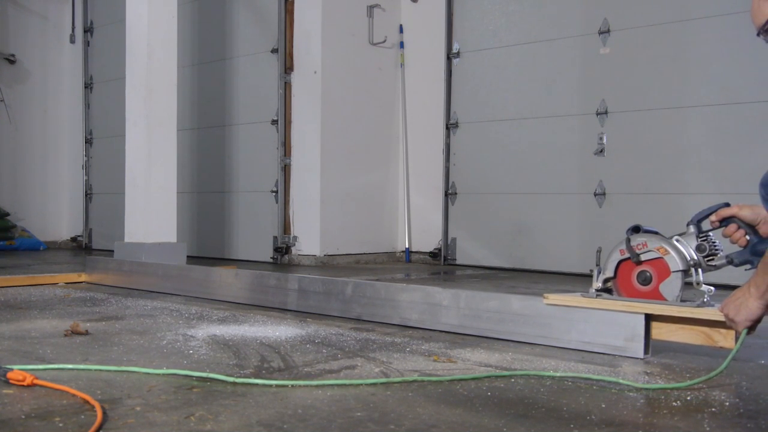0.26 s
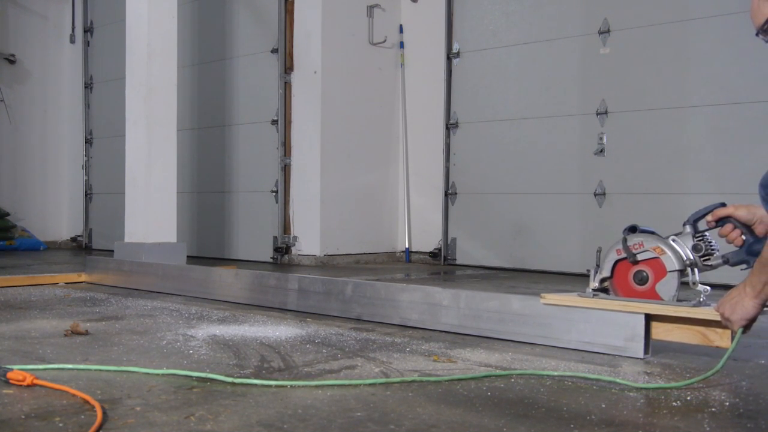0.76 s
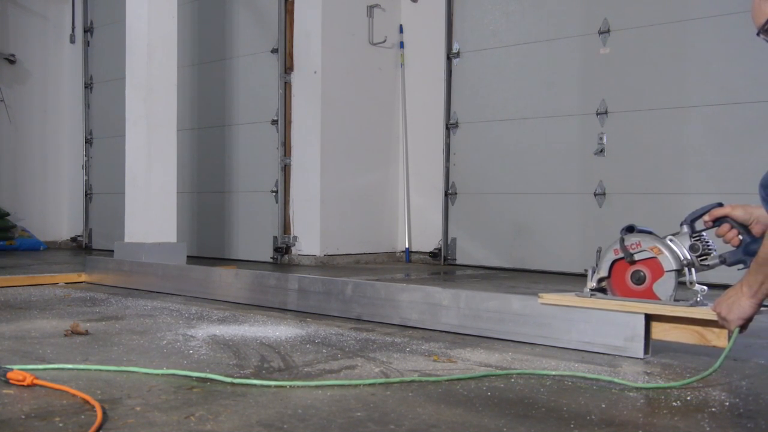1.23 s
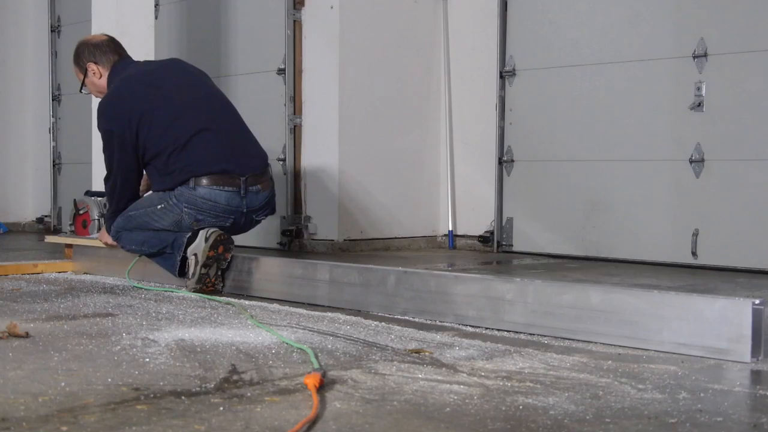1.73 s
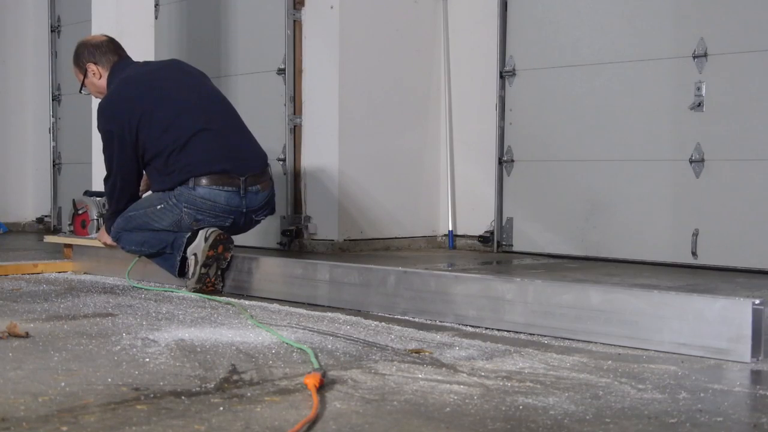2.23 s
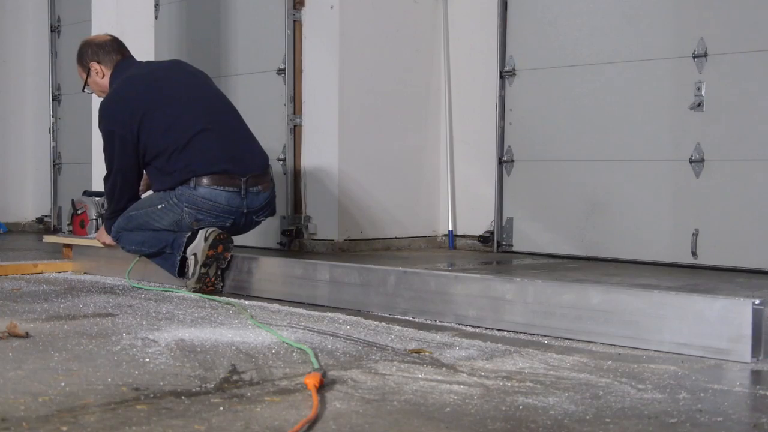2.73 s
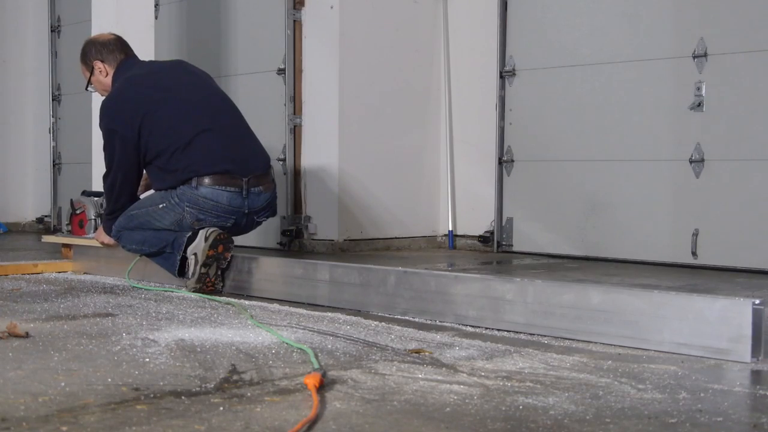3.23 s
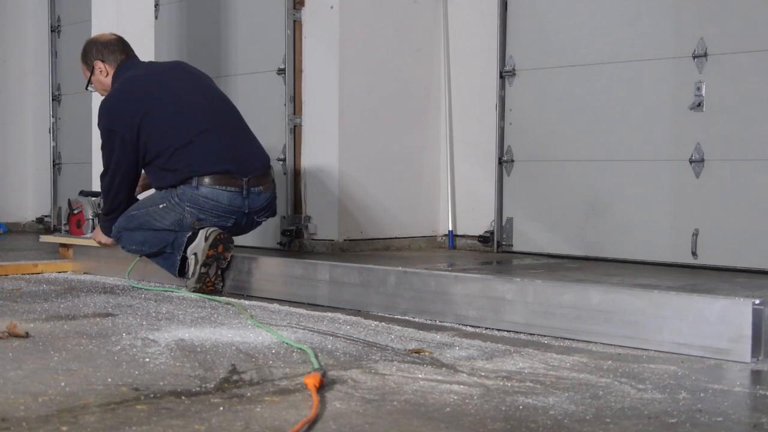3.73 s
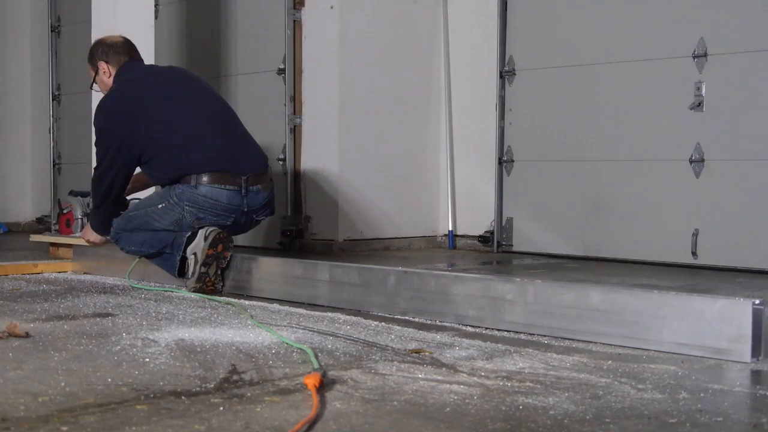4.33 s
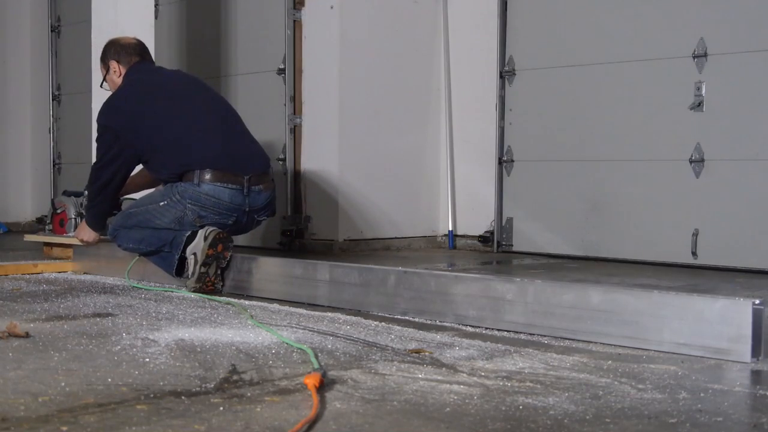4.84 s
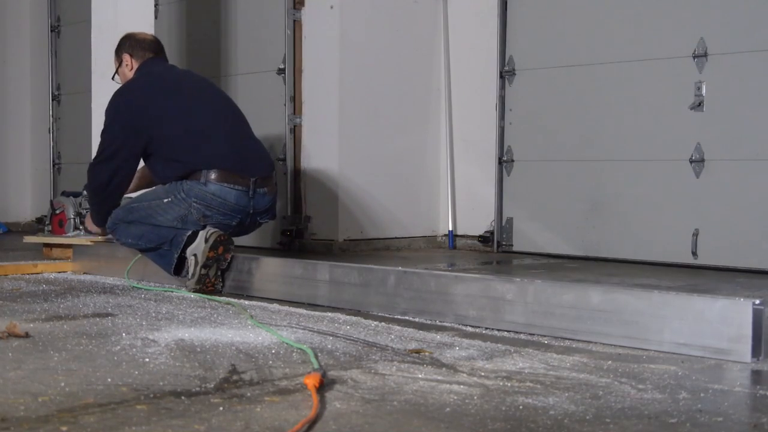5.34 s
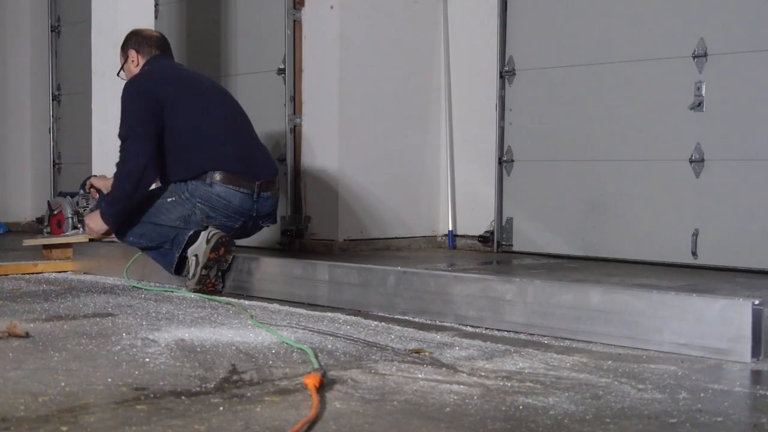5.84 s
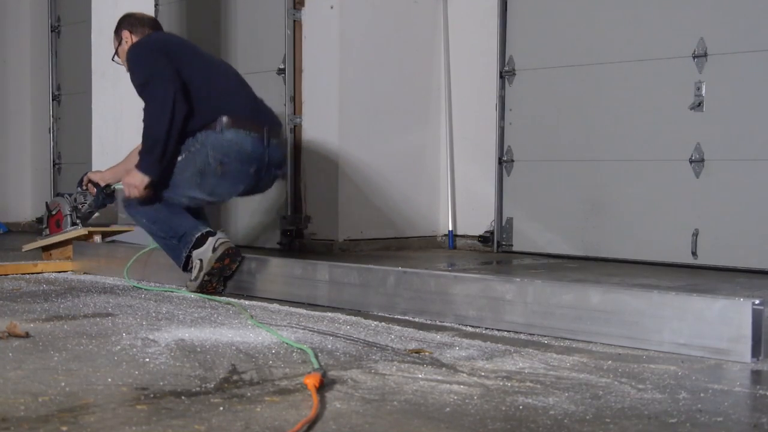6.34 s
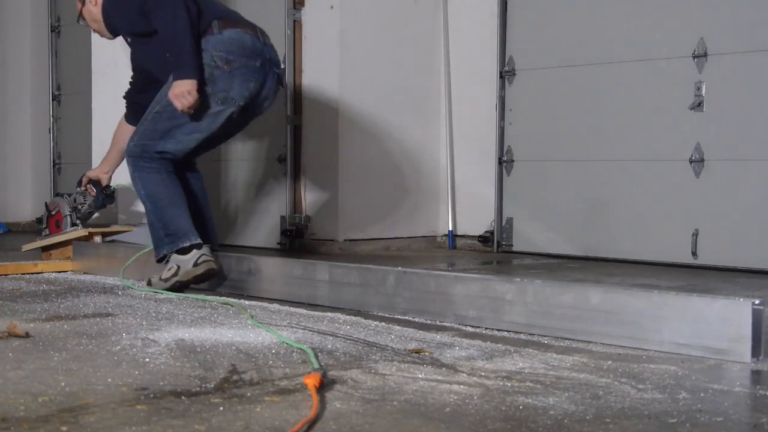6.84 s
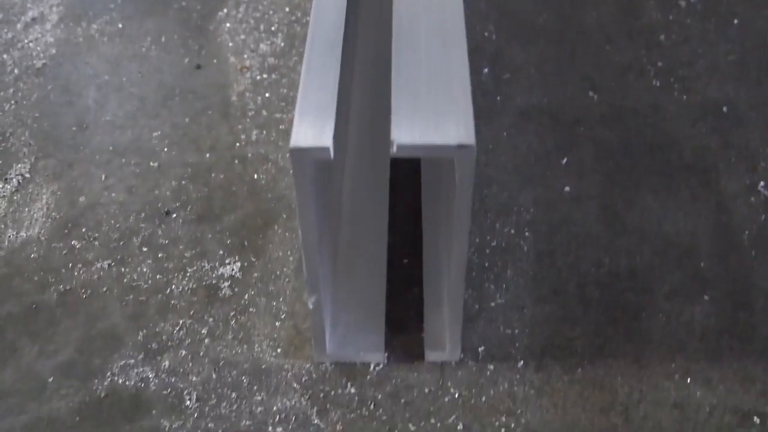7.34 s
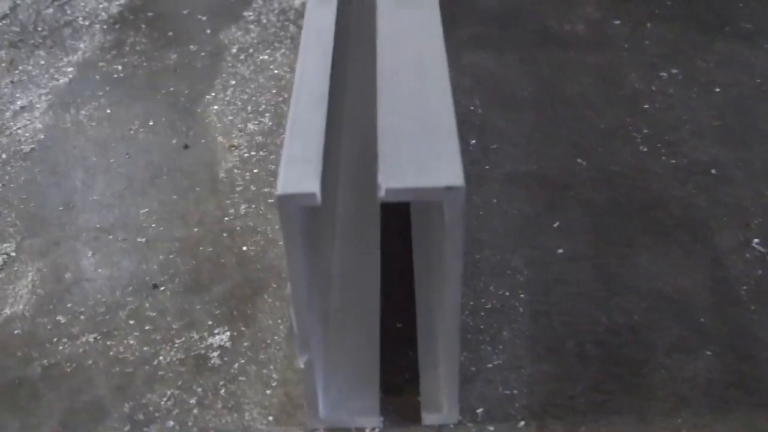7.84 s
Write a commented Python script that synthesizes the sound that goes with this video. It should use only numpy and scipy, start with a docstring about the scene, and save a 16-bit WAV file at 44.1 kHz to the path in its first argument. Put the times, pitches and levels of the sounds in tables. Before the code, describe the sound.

A handheld circular saw is already running close to the microphone, a steady motor roar with a held whine and hissing metal chips. At 1.5 seconds the sound jumps to across a concrete garage, with a short echo. The teeth grind and sing through an aluminium tube in a rough, fluttering, ringing tone that sags in pitch until about 2 seconds, then climbs steadily as the blade speeds up. The tube rattles lightly around 3.2 seconds and harder, twice, near 4.2 and 4.3. A bright screech at about 4.6 ends the cut. The motor is released and the blade coasts with an airy whirr that falls in pitch but stays fairly loud. At 7 seconds it cuts abruptly to the quiet garage: a soft rush from outside, a fading hiss, and two tiny ticks of chips underfoot near 7.5 and 8 seconds.

```python
"""Circular saw in a concrete garage

A hand-held saw, heard from three places in turn. Close by, its fan roars and its housing whines.
From across the floor its teeth sing through the end of an aluminium tube, bog down, speed up,
rattle out of the cut and coast. Last comes the quiet garage with a rush from outside."""
import sys
import numpy as np
from scipy import signal
from scipy.fft import rfft, irfft, next_fast_len
from scipy.io import wavfile
from scipy.ndimage import uniform_filter1d

SR = 44100
rng = np.random.default_rng(int(sys.argv[2]) if len(sys.argv) > 2 else 0)


def transcribe(u):
    """Save the signal u as a 16-bit wav file named by the first command-line argument.

    u: samples, shape (n,) or (channels, n), limited to [-1, 1]; the rate is SR.
    q: integer samples, one column per channel.
    """
    v = np.clip(np.atleast_2d(u).T, -1, 1)
    q = np.round(v * 32767).astype(np.int16)
    wavfile.write(sys.argv[1], SR, q)


N = 356328
TIME = np.arange(N) / SR
CLOSE, ACROSS, LAST = range(3)   # listening places
MOVES_S = (1.492, 6.99)


def from_db(db):
    """Decibels to gain."""
    return np.exp(np.asarray(db) * np.log(10) / 20)


def rms_one(x):
    """Scale to rms 1."""
    return x / np.sqrt(np.mean(x ** 2) + 1e-20)


def in_time(rows):
    """Table columns as curves over all samples."""
    times_s, *columns = np.transpose(rows)
    return [np.interp(TIME, times_s, column) for column in columns]


def at_hz(points, hz):
    """Interpolate on a log frequency axis."""
    points_hz, values = np.transpose(points)
    return np.interp(np.log(hz), np.log(points_hz), values)


def swell(centre_s, length_s, db):
    """Flat-topped bump of gain."""
    return from_db(db) * np.exp(-(2 * (TIME - centre_s) / length_s) ** 4)


def drift(rate_hz):
    """Slow random curve, rms 1."""
    hop, settle = 40, 2000
    r = np.exp(-2 * np.pi * rate_hz * hop / SR)
    slow = signal.lfilter([1], [1, -2 * r, r * r], rng.standard_normal(N // hop + settle + 2))[settle:]
    return np.interp(np.arange(N) / hop, np.arange(len(slow)), rms_one(slow))


def wavering(cycles, wobble_rad):
    """Sine with wandering phase, rms 1."""
    return np.sqrt(2) * np.sin(2 * np.pi * cycles + wobble_rad * drift(10.6))


def blurred(cycles, width_hz):
    """Noise band riding on a pitch, rms 1."""
    r = np.exp(-np.pi * width_hz / SR)
    a, b = signal.lfilter([1], [1, -2 * r, r * r], rng.standard_normal((2, N)))
    return rms_one(a * np.sin(2 * np.pi * cycles) + b * np.cos(2 * np.pi * cycles))


def butter(x, hz, kind):
    """Fourth-order low- or high-pass."""
    return signal.sosfilt(signal.butter(4, hz, kind, fs=SR, output="sos"), x)


def resonance(x, hz, width_hz):
    """Two-pole ring, peak gain 1."""
    r = np.exp(-np.pi * width_hz / SR)
    gain = (1 - r * r) / 2
    return signal.lfilter([gain, 0, -gain], [1, -2 * r * np.cos(2 * np.pi * hz / SR), r * r], x)


def ringing(x, modes):
    """Parallel resonances driven by x."""
    return sum(from_db(db) * resonance(x, hz, width_hz) for hz, width_hz, db in modes)


# Likeness of the two ears: f/Hz, correlation
EAR_LIKENESS = [(30, .1), (130, 0.99), (640, 0.71), (1400, 0.81), (3100, 0.82), (6800, 0.52), (15000, 0.44)]


def roar(spectrum, modes, patchy_db, place, echo_t60_s=.3, echo_db=-10):
    """Stereo turbulence at one place, rms 1: lifted at resonances, combed by floor and wall echoes."""
    edges = [0, *(np.array(MOVES_S) * SR).astype(int), N]
    start, end = edges[place], min(edges[place + 1] + SR // 20, N)
    size = next_fast_len(end - start)
    hz = np.maximum(np.arange(size // 2 + 1) * SR / size, 10)
    lift_db = sum(db / (1 + (2 * (hz - mode_hz) / width_hz) ** 2) for mode_hz, width_hz, db in modes)
    inside = (hz > spectrum[0][0]) & (hz < spectrum[-1][0])
    shape = inside * from_db(at_hz(spectrum, hz) + lift_db)
    age_s = np.arange(SR // 4) / SR
    echoes = rms_one(rng.standard_normal((2, len(age_s))) * from_db(-60 * age_s / echo_t60_s))
    comb = 1 + from_db(echo_db) * rfft(echoes, size) / np.sqrt(len(age_s))
    mid, side = rfft(rng.standard_normal((2, size))) * comb
    alike = at_hz(EAR_LIKENESS, hz)
    ears = shape * (np.sqrt(1 + alike) * mid + np.sqrt(1 - alike) * side * [[1], [-1]])
    band = np.log2(hz / spectrum[0][0]) / 1.5   # 1.5-octave bands swell independently
    out = 0
    for k in range(int(band[inside].max()) + 2):
        share = np.clip(1 - abs(band - k), 0, 1)
        gain = from_db(patchy_db * drift(8.2)[start:end])
        out = out + gain * irfft(ears * share, size)[:, :end - start]
    return np.pad(rms_one(out), ((0, 0), (start, N - end)))


def garage(x, t60_s=1, wet_db=-7):
    """Direct sound plus a separate diffuse tail in each ear."""
    age_s = np.arange(int(1.2 * SR)) / SR
    tail = rng.standard_normal((2, len(age_s))) * from_db(-60 * age_s / t60_s) * (age_s > .006)
    tail /= np.sqrt(np.sum(tail ** 2, axis=1, keepdims=True))
    wet = signal.fftconvolve(x[None], tail, axes=1)[:, :N]
    return (x + from_db(wet_db) * wet) / np.sqrt(1 + from_db(2 * wet_db))


# Saw close by: t/s, motor and fan/dB, chip spray/dB
NEAR_LEVELS = [(0, -26.5, -30), (0.2, -26.5, -28), (0.75, -27.5, -29), (1.27, -28, -29),
               (1.47, -26.5, -29.5)]
# Motor and fan spectrum: f/Hz, level/dB
NEAR_FAN = [(59, -82), (100, -47), (204, -22), (635, -8), (719, -3.5), (800, -1), (923, -4), (1010, -2),
            (1250, -2), (1440, -7), (2240, -8.5), (2780, -4), (7000, -8.5), (9100, -21), (15400, -120)]
# Chip spray spectrum: f/Hz, level/dB
NEAR_CHIPS = [(3240, -8), (5500, -2.5), (6080, -10), (7860, -9), (9570, -4.5), (11000, -5), (12900, -9.5),
              (15600, -12)]
# Motor orders, housing and guard: f/Hz, width/Hz, lift/dB
NEAR_PEAKS = [(210, 10, 7), (317, 10, 7.5), (414, 10, 8), (527, 8.9, 7), (605, 14, 2.5), (700, 25, 4.5),
              (737, 12.5, 7.5), (857, 16, 5), (1056, 12, 8), (1220, 63, 6), (1275, 50, 4), (1310, 43, 4),
              (1980, 520, 7.5), (2590, 25, 10), (2830, 390, 6.5), (3660, 24, 12), (5070, 110, 2.5),
              (5500, 120, 2.5), (9860, 460, 1)]
# Housing whines: f/Hz, relative level/dB
WHINES = [(947.5, 4.5), (3160, -0.5), (2850, -23)]
# Whine swells: centre/s, length/s, level/dB
WHINE_LEVELS = [(0.24, 0.19, -38.5), (0.577, 0.43, -39.5), (0.962, 0.074, -44)]


def saw_near():
    """Fan and brushes roar, chips spray, the housing whines at held pitches."""
    fan_db, chips_db = in_time(NEAR_LEVELS)
    whines = sum(from_db(db + 1.9 * drift(4)) * wavering(hz * TIME, wobble_rad=.9) for hz, db in WHINES)
    whines *= sum(swell(*row) for row in WHINE_LEVELS)
    fan = from_db(fan_db) * roar(NEAR_FAN, NEAR_PEAKS, patchy_db=.7, place=CLOSE)
    chips = from_db(chips_db) * roar(NEAR_CHIPS, NEAR_PEAKS, patchy_db=1.5, place=CLOSE)
    return fan + chips + garage(whines)


def rumble(level_db=-65.5, top_hz=35):
    """Faint deep noise under the saw."""
    return from_db(level_db) * rms_one(butter(rng.standard_normal((2, N)), top_hz, "low"))


# Blade under power: t/s, tooth rate/Hz
BLADE_SPEED = [(1.49, 2075), (1.6, 2025), (1.78, 1950), (1.9, 1840), (1.97, 1783), (2.05, 1760),
               (2.13, 1797), (2.22, 1905), (2.36, 2150), (2.52, 2415), (2.62, 2530), (2.67, 2560),
               (2.8, 2665), (2.97, 2748), (3.14, 2798), (3.4, 2830), (3.8, 2910), (4.0, 2938), (4.17, 2960),
               (4.45, 3025), (4.62, 3045)]
RELEASE_S = BLADE_SPEED[-1][0]


def blade_rate(drag_s=4.15, friction_hz=2200):
    """Teeth per second: driven until trigger release, then slowed by air drag and bearing friction."""
    coasting = np.exp(-np.maximum(TIME - RELEASE_S, 0) / drag_s)
    rate_hz = (in_time(BLADE_SPEED)[0] + friction_hz) * coasting - friction_hz
    return uniform_filter1d(rate_hz, size=SR // 20)   # blade inertia


# Blade in the cut: t/s, tooth tone/dB, overtones/dB
TOOTH_LEVELS = [(1.49, -38, -29), (1.56, -43, -48), (1.65, -37.5, -38), (1.72, -50, -40), (1.9, -33.5, -27),
                (1.99, -34, -35), (2.06, -32, -32), (2.1, -50, -40), (2.13, -35, -35), (2.22, -40, -31),
                (2.29, -58, -34), (2.36, -44, -34), (2.4, -48, -32), (2.44, -40, -36), (2.48, -54, -33),
                (2.53, -40, -42), (2.59, -41, -31), (2.62, -35, -27), (2.645, -34.5, -37), (2.67, -50, -33),
                (2.74, -38, -35), (2.8, -37.5, -39), (2.88, -43, -37), (3.0, -46, -43), (3.14, -34, -36),
                (3.2, -43, -34), (3.23, -60, -39), (3.255, -55, -43), (3.275, -35, -37), (3.3, -42, -33),
                (3.325, -55, -37), (3.35, -40, -40), (3.39, -48, -37), (3.46, -70, -46), (3.7, -58, -59),
                (3.78, -41, -52), (3.9, -65, -42), (3.94, -38.5, -41), (4.01, -44, -49), (4.08, -72, -39),
                (4.16, -40.5, -30), (4.22, -59, -51), (4.33, -36.5, -40), (4.39, -39, -40),
                (4.45, -36, -38), (4.5, -46, -38), (4.62, -54, -41)]
# Partials 2 to 5: relative level/dB
PARTIALS_DB = [1, -2, -6, -16]
# Teeth in the metal: t/s, wall grinding/dB, chip noise/dB, screech/dB
BITE_LEVELS = [(1.5, -42, -36.5, -42), (1.7, -32, -35.5, -41), (2.07, -44, -41.5, -39.5),
               (2.25, -35, -41, -37), (2.36, -26, -45, -46), (2.6, -34.5, -42, -36), (2.8, -40, -45, -44),
               (3.3, -39, -51, -44), (3.5, -40.5, -46, -47), (4.05, -47, -47.5, -65),
               (4.3, -39, -46.5, -51), (4.6, -37, -35, -22)]
# Tube resonances: f/Hz
TUBE_HZ = [1768, 1840, 1930, 2010, 2155, 2290, 2408, 2537, 2662, 2798, 2938, 3030]
# Peak of each: gain/dB
TUBE_DB = [14, 12, 11, 13, 13, 13, 11, 18, 9, 16, 14, 5]
TUBE_WIDTH_HZ = 26
TUBE_MODES = [(hz, TUBE_WIDTH_HZ, db) for hz, db in zip(TUBE_HZ, TUBE_DB)]
# Upper rings of the tube wall: f/Hz, width/Hz, gain/dB
WALL_MODES = [(3560, 30, 9), (3690, 30, 12), (3850, 35, 10), (4050, 30, 12), (4210, 35, 11), (4400, 40, 8),
              (5050, 40, 8), (5250, 45, 10)]


def tooth_song(teeth, rate_hz, clean_hz=3030, thin_s=3.45):
    """Tooth strikes make partials that roughen under load and ring the tube at its resonances."""
    tone_db, overtones_db = in_time(TOOTH_LEVELS)
    _, chips_db, screech_db = in_time(BITE_LEVELS)
    slowing = np.maximum(clean_hz - rate_hz, 0) / 500
    load = np.minimum(slowing, 1)
    flare_db = 1.2 * drift(20) + 3 * load * drift(35)   # blade wobbles in the kerf
    smear_rad = 1.25 * load
    first = from_db(tone_db + flare_db) * wavering(teeth, wobble_rad=.1 + smear_rad)
    first += from_db(chips_db) * blurred(teeth, width_hz=297)   # uneven chips
    chatter = from_db(tone_db - 8) * blurred(teeth, width_hz=450)   # uneven teeth
    chip_shake = from_db(chips_db + 3) * rng.standard_normal(N)
    tube = ringing(first + chatter + chip_shake, TUBE_MODES)
    upper_loss_db = 4 * slowing + 11 * np.clip((TIME - thin_s) / .1, 0, 1)
    overtones = 0
    for k, db in enumerate(PARTIALS_DB, start=2):
        loss_db = upper_loss_db if k > 2 else 7 * load
        gain = from_db(overtones_db + db - loss_db + 1.8 * drift(9.3))
        cycles = k * (teeth + smear_rad * drift(30) / (4 * np.pi))
        overtones += gain * blurred(cycles, width_hz=26 * k)
    screech = from_db(screech_db + flare_db) * blurred(2 * teeth, width_hz=420)
    return first + tube + overtones + screech + ringing(screech, WALL_MODES)


# Saw across the floor: t/s, low roar/dB, motor and fan/dB, chips and blade air/dB
FAR_LEVELS = [(1.5, -32.5, -25, -32.5), (1.8, -33, -25, -32), (2.24, -34.5, -26, -36.5),
              (2.55, -40, -28.5, -35), (2.62, -40.5, -31, -31.5), (2.85, -42, -33, -36.5),
              (3.29, -41.5, -30.5, -31.5), (3.49, -39, -31.5, -37.5), (3.8, -40, -32, -36),
              (4.08, -37, -30, -34), (4.3, -35.5, -29.5, -32), (4.45, -37, -29.5, -38),
              (4.75, -41, -31, -45), (5.5, -41.5, -33, -43.5), (6.07, -40.5, -29.5, -38.5),
              (6.95, -40.5, -28, -40)]
# Motor and fan spectrum under power: f/Hz, level/dB
DRIVEN_FAN = [(530, -37), (900, -21), (998, -29), (1390, 0), (2020, 1.5), (2290, 1.5), (2870, -4.5),
              (3070, -5), (5100, 1), (7000, -11), (9100, -11), (15400, -120)]
# Motor and fan spectrum, coasting: f/Hz, level/dB
COASTING_FAN = [(530, -13), (900, -12), (1130, -13), (1190, 0.5), (1350, -3.5), (1610, 4.5), (3230, 0),
                (4180, -2), (4480, 1.5), (5350, -2.5), (5600, -5), (7000, -10.5), (9100, -14),
                (15400, -120)]
# Low roar spectrum: f/Hz, level/dB
LOW_ROAR = [(160, -32), (280, -18.5), (404, -9.5), (456, -15), (546, -7), (594, -10), (967, -3.5),
            (1300, -2), (1690, -10), (2860, -120)]
# Wall grinding spectrum: f/Hz, level/dB
GRINDING = [(3200, 3), (3500, 1), (3800, 7.5), (4250, 6), (4600, -42), (4900, -14)]
# Floor hum spectrum: f/Hz, level/dB
FLOOR_HUM = [(65, -65), (110, -69), (180, -6.5), (253, -17), (320, -5), (420, 0), (700, -120)]
# Floor hum: t/s, level/dB
HUM_LEVELS = [(1.5, -49.5), (2.5, -56.5), (3.1, -64), (3.9, -67), (5.1, -79), (5.8, -58), (6.9, -54)]
# Chip and blade air spectrum: f/Hz, level/dB
FAR_CHIPS = [(3530, -13.5), (6000, -7), (6550, -7.5), (8600, -7), (10500, -6), (14500, -22.5), (15600, -14)]
# Housing and garage: f/Hz, width/Hz, lift/dB
FAR_PEAKS = [(396, 30, 4), (800, 90, 5), (1200, 50, 3), (1600, 105, 4), (3960, 50, -5), (4640, 70, -6),
             (5550, 80, -6), (9360, 880, 2), (12900, 110, 1)]
# Free blade: f/Hz, width/Hz, lift/dB
BLADE_PEAKS = [(1260, 50, 3), (1550, 110, 2), (1780, 60, -4), (2330, 120, 3), (2800, 70, 3), (3420, 60, 3),
               (3630, 60, 3), (3810, 70, 4), (4070, 50, 5), (4170, 70, 5), (4950, 200, 2), (5300, 100, 4)]


def far_roar(powered):
    """Fan, grinding, floor hum and chips; the tube colours the fan in the cut, the free blade after."""
    low_db, fan_db, chips_db = in_time(FAR_LEVELS)
    grind_db = in_time(BITE_LEVELS)[0]
    tube_peaks = [(hz, width_hz, .27 * db) for hz, width_hz, db in TUBE_MODES + WALL_MODES]
    driven = roar(DRIVEN_FAN, FAR_PEAKS + tube_peaks, patchy_db=1.64, place=ACROSS)
    coasting = roar(COASTING_FAN, FAR_PEAKS + BLADE_PEAKS, patchy_db=1, place=ACROSS)
    fan = from_db(fan_db) * (np.sqrt(powered) * driven + np.sqrt(1 - powered) * coasting)
    low = from_db(low_db) * roar(LOW_ROAR, FAR_PEAKS, patchy_db=1.2, place=ACROSS)
    grind = powered * from_db(grind_db) * roar(GRINDING, [], patchy_db=.5, place=ACROSS)
    hum = from_db(in_time(HUM_LEVELS)[0]) * roar(FLOOR_HUM, [], patchy_db=4, place=ACROSS)
    chips = from_db(chips_db) * roar(FAR_CHIPS, FAR_PEAKS, patchy_db=.74, place=ACROSS)
    return fan + low + grind + hum + chips


# Motor and gear lines crossing resonances: centre/s, length/s, level/dB, share of tooth rate
MOTOR_LINES = [(1.77, 0.36, -38, .5), (1.85, 0.3, -46, .286), (2.55, 0.18, -45, .339),
               (2.72, 0.2, -50, .213), (3.165, 0.11, -36.5, .339), (3.1, 0.6, -54, .142),
               (3.2, 0.5, -47.5, .197), (3.65, 0.4, -43, .339), (3.75, 0.4, -50, .197),
               (3.85, 0.6, -48, .355), (3.85, 0.16, -43.5, .213), (4.0, 0.5, -46.5, .142),
               (4.0, 0.6, -54, .107), (3.9, 0.8, -45, .423), (3.9, 0.8, -49, .286),
               (4.426, 0.12, -39, .392)]


def motor_lines(teeth):
    """Clean tones tied to blade speed, each swelling briefly."""
    wander_rad = .45 * drift(8.8)
    return np.sqrt(2) * sum(swell(s, length_s, db) * np.sin(2 * np.pi * share * teeth + wander_rad)
                            for s, length_s, db, share in MOTOR_LINES)


# Rattle bursts: centre/s, length/s, level/dB
RATTLE_BURSTS = [(3.25, 0.62, -37.5), (4.17, 0.12, -29), (4.305, 0.088, -30), (4.43, 0.1, -50)]
# Knocked tube: f/Hz, width/Hz, relative level/dB
KNOCK_MODES = [(1720, 50, -25), (1985, 34, 8), (2136, 14, 0), (2510, 130, 9), (3420, 130, -1),
               (3800, 85, -6), (5100, 220, -6)]


def rattle(teeth, teeth_per_knock=14):
    """The tube knocks on the guide in step with the blade as it breaks out."""
    knocks = np.diff(np.floor(teeth / teeth_per_knock), prepend=0) * from_db(2.1 * drift(60))
    tube = sum(from_db(db) * rms_one(resonance(knocks, hz, width_hz))
               for hz, width_hz, db in KNOCK_MODES)
    return sum(swell(*row) for row in RATTLE_BURSTS) * rms_one(tube)


# Chopped air: share of tooth rate, width/Hz, relative level/dB, fade/(dB/s)
WHIRR_PARTIALS = [(.17, 90, -17, 12), (.35, 190, -6, 8), (.44, 230, -6, 8), (1, 450, -3, 3),
                  (2, 650, -3, 2), (3, 900, -2, 1)]
# Blade guard: f/Hz, width/Hz, gain/dB
GUARD_MODES = [(400, 30, 12), (745, 35, 8), (815, 35, 14), (955, 35, 11), (1200, 35, 14), (1560, 60, 6),
               (1750, 250, 5), (1950, 80, 4), (2450, 120, 2), (3640, 70, 12), (3810, 70, 14),
               (4070, 60, 11), (4190, 70, 9), (4900, 250, 8), (5300, 120, 8)]


def whirr(teeth, gain_db=-42.5, top_hz=5200):
    """Free blade and rotor chop the air; the falling partials ring the guard as they pass its modes."""
    air = sum(from_db(db - fade_db_per_s * (TIME - RELEASE_S)) * blurred(share * teeth, width_hz)
              for share, width_hz, db, fade_db_per_s in WHIRR_PARTIALS)
    air = butter(air, top_hz, "low")
    return from_db(gain_db) * (air + ringing(air, GUARD_MODES))


def saw_far(fade_s=.27):
    """The saw cuts, then coasts; its tones echo in the garage over the roar."""
    rate_hz = blade_rate()
    teeth = np.cumsum(rate_hz) / SR
    powered = np.clip((RELEASE_S - TIME) / fade_s, 0, 1)
    song = powered * tooth_song(teeth, rate_hz)
    tones = song + motor_lines(teeth) + rattle(teeth) + (1 - powered) * whirr(teeth)
    return garage(butter(tones, 250, "high")) + far_roar(powered)


# Outside rush spectrum: f/Hz, level/dB
OUTSIDE_RUSH = [(29, -56), (50, -31), (114, -11), (272, -5.5), (356, -5.5), (466, -10.5), (623, -8),
                (691, -1.5), (798, -1.5), (2070, -2.5), (4170, -12.5), (7000, -23), (9100, -64),
                (15400, -120)]
# Hiss spectrum: f/Hz, level/dB
QUIET_HISS = [(3240, -20), (5500, -1), (8920, -0.5), (10800, 1.5), (11400, -1), (13000, -7), (13300, -10),
              (15000, -15), (15600, -14)]
# Hiss: t/s, level/dB
HISS_FADE = [(7.0, -52.5), (7.5, -54), (7.8, -58), (8.08, -62.5)]
# Faint colour of rush and hiss: f/Hz, width/Hz, lift/dB
QUIET_PEAKS = [(4200, 200, 3), (4870, 220, 4), (5550, 90, -5), (11600, 420, 4)]


def quiet_garage():
    """A soft rush from outside swells once; a hiss and a faint ring fade."""
    rush_gain = from_db(-43) + swell(centre_s=7.73, length_s=.08, db=-50)
    rush = rush_gain * roar(OUTSIDE_RUSH, QUIET_PEAKS, patchy_db=.8, place=LAST)
    hiss = from_db(in_time(HISS_FADE)[0]) * roar(QUIET_HISS, QUIET_PEAKS, patchy_db=.5, place=LAST)
    ring_db = -60 - 14 * (TIME - MOVES_S[1])
    return rush + hiss + from_db(ring_db) * blurred(4200 * TIME, width_hz=80)


# Chips underfoot: t/s, level/dB, f/Hz
CHIP_TICKS = [(7.5383, -42, 6600), (7.5383, -50, 9500), (8.0292, -52, 9700)]


def chip_ticks(t60_s=.012):
    """Chips underfoot give tiny, rough pings."""
    ticks = 0
    for start_s, db, hz in CHIP_TICKS:
        age_s = np.maximum(TIME - start_s, 0)
        ping = from_db(db - 60 * age_s / t60_s) * np.sin(2 * np.pi * hz * age_s)
        ticks += ping * rng.normal(.8, .6, N)
    return ticks


def scene(join_s=.0048):
    """Three listening places in turn, joined by short crossfades."""
    to_across, to_last = (np.clip((TIME - s) / join_s, 0, 1) for s in MOVES_S)
    saw = rumble() + (1 - to_across) * saw_near() + to_across * saw_far()
    quiet = (chip_ticks() + quiet_garage()) * from_db([[-.8], [.8]])   # leans right
    return (1 - to_last) * saw + to_last * quiet


def record(dry, offset=-.0029, cutoff_hz=16100):
    """Small DC offset and a steep low-pass."""
    return signal.sosfilt(signal.cheby2(12, 70, cutoff_hz, fs=SR, output="sos"), dry + offset)


dry = scene()
out = record(dry)
transcribe(out)
```